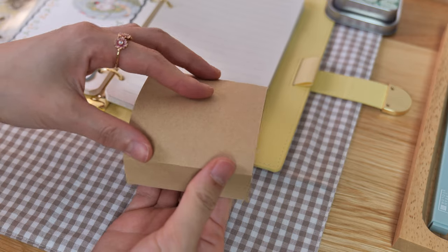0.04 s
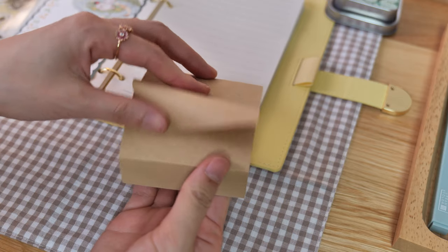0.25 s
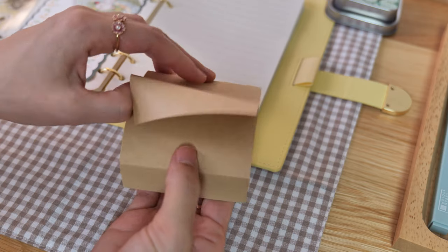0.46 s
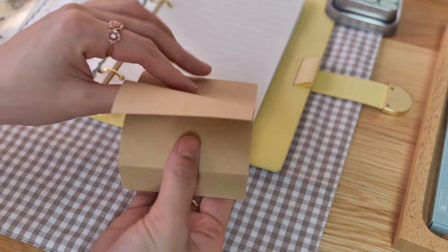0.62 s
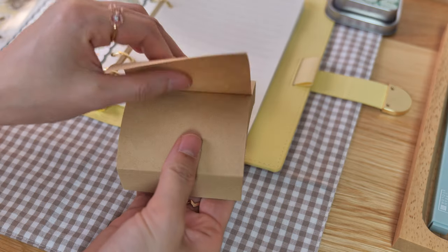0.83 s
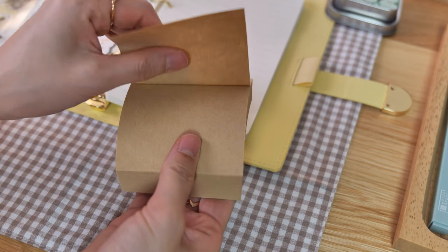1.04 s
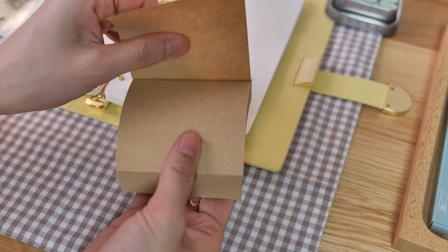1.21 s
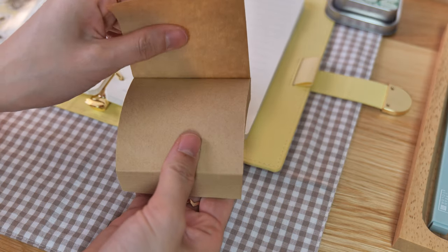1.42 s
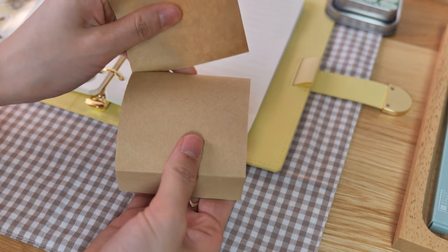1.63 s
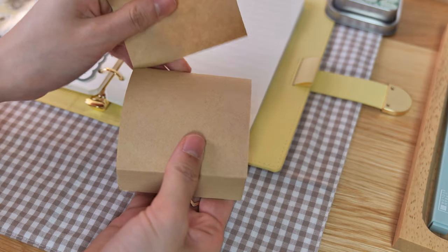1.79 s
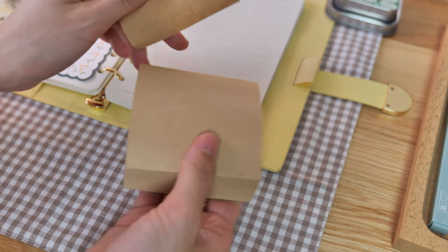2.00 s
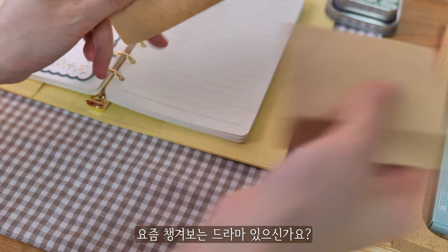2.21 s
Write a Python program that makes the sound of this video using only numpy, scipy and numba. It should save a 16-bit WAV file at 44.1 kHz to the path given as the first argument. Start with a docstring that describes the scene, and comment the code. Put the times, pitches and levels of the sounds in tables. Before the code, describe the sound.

A stiff paper sheet scrapes over its pad and buckles with two sharp snaps. Fingers rub it softly, then it peels off the glued edge with small crackling pops, followed by light handling. Close up in a quiet, dry room.

```python
"""A stiff paper sheet is pushed back over its pad, scraping, and buckles with two sharp snaps.
It flexes, knocks the pad, is rubbed between finger and thumb, then tears off the glued edge in small pops.
The freed sheet flaps and the pad is handled. Friction is fibres catching and slipping; snaps and pops
are sudden releases that ring the paper. All of it is close by, in a quiet, dry room."""
import sys
import numpy as np
from scipy import signal
from scipy.fft import rfft, irfft
from scipy.io import wavfile
from scipy.ndimage import uniform_filter1d
from numba import njit

SR = 44100
rng = np.random.default_rng(int(sys.argv[2]) if len(sys.argv) > 2 else 0)


def digitize_waveform(pressure):
    """Quantize a signal to 16-bit integers and store it at the path in sys.argv[1].

    Rows of a 2-D input are taken as channels; values are limited to [-1, 1].
    """
    field = np.atleast_2d(pressure).T
    bounded = np.clip(field, -1, 1)
    quanta = np.round(bounded * 32767).astype(np.int16)
    wavfile.write(sys.argv[1], SR, quanta)


N = 103635
TIME_S = np.arange(N) / SR


def undb(db):
    """Decibels to gain."""
    return 10 ** (np.asarray(db) / 20)


def unit(x):
    """Scale to rms 1."""
    return x / np.sqrt(np.mean(x ** 2) + 1e-24)


def envelope(curve):
    """Level curve as gain, silent beyond its ends."""
    time_s, db = np.array(curve).T
    return undb(np.interp(TIME_S, np.r_[time_s[0] - .01, time_s, time_s[-1] + .01], np.r_[-120, db, -120]))


def colour(x, spectrum, tilt_db_per_oct=0, tilt_from_hz=2160):
    """Minimum-phase filter with a treble tilt; keeps the power of white noise."""
    size = 2048
    hz, db = np.array(spectrum).T
    octave = np.log2(np.maximum(np.arange(size // 2 + 1), 1) * SR / size)
    tilt_db = tilt_db_per_oct * np.maximum(octave, np.log2(tilt_from_hz))
    cepstrum = irfft(np.log(undb(np.interp(octave, np.log2(hz), db) + tilt_db)))
    causal = np.r_[cepstrum[0], 2 * cepstrum[1:size // 2]]
    impulse = irfft(np.exp(rfft(causal, size)))
    return signal.fftconvolve(x, impulse / np.linalg.norm(impulse))[:len(x)]


@njit
def sweep(x, hz, width_hz):
    """Moving resonance, gain 1 at its centre."""
    y = np.empty(len(x))
    band_state, low_state = 0., 0.
    for i in range(len(x)):
        g = np.tan(np.pi * hz[i] / SR)
        damping = width_hz / hz[i]
        band = (band_state + g * (x[i] - low_state)) / (1 + g * (g + damping))
        band_state = 2 * band - band_state
        low_state += 2 * g * band
        y[i] = damping * band
    return y


def wander(rate_hz):
    """Smooth random drift, rms 1."""
    hold = max(int(SR / rate_hz), 1)
    return unit(uniform_filter1d(rng.standard_normal(N)[np.arange(N) // hold], hold))


def add(out, time_s, x):
    """Mix x in at time_s."""
    start = int(time_s * SR)
    out[start:start + len(x)] += x[:N - start]


def fibres(slips_per_s, spread_db, hiss, spurt_db, spurt_hz):
    """Fibres catch and slip: dense clicks over fine hiss, in spurts."""
    slips = (rng.random(N) < slips_per_s / SR) * rng.choice([-1, 1], N)
    sizes = undb(spread_db * np.minimum(rng.exponential(size=N), 4))
    grain = unit(slips * sizes) + hiss * rng.standard_normal(N)
    return unit(grain * undb(spurt_db * wander(spurt_hz)))


def burst(decay_s, kick_s=0.00023):
    """Sudden release: a kick and a fast-dying rattle."""
    t = TIME_S[:SR // 8]
    return rng.choice([-1, 1], len(t)) * np.exp(-t / decay_s) * (1 + np.exp(-t / kick_s))


def cracks(events, spectrum):
    """Sudden slips ring the paper for a few milliseconds."""
    out = np.zeros(N)
    for time_s, db, decay_s, tilt in events:
        add(out, time_s, undb(db) * colour(burst(decay_s), spectrum, tilt))
    return out


# still air (frequency [Hz], level [dB])
AIR_SPECTRUM = [(25, -15), (120, -12), (220, -5.5), (450, -7), (750, -12.5), (900, -4.5), (1150, -13.5),
                (1700, -20.5), (4000, -27), (15500, -29.5)]


def room_tone(air_db=-55, hum_hz=81, hum_db=-69.5):
    """Still air and a low, wavering hum."""
    air = unit(colour(rng.standard_normal(N), AIR_SPECTRUM))
    hum = np.sqrt(2) * np.sin(2 * np.pi * hum_hz * TIME_S)
    return undb(air_db) * air + undb(hum_db + 2.1 * wander(3.7)) * hum


# sheet-on-pad friction (time [s], level [dB])
SLIDE_LEVEL = [(.13, -78), (.156, -46), (.195, -48), (.204, -33), (.216, -36), (.228, -16.5), (.252, -21.5),
               (.282, -20.5), (.34, -25.5), (.408, -33.5), (.44, -21), (.466, -22), (.485, -21.5),
               (.508, -16.5), (.521, -29.5), (.546, -41), (.592, -31.5), (.603, -24.5), (.62, -33.5),
               (.69, -38.5), (.8, -41.5), (.844, -49.5), (.874, -73.5)]
# friction by stage (frequency [Hz], level [dB])
CATCH_SPECTRUM = [(100, -37), (300, -5), (900, -5.5), (1600, -11), (2200, -8.5), (3200, -9), (5500, 1.5),
                  (7200, -3), (8700, 1.5), (10200, -13), (13000, -7), (15500, -18.5)]
SLIDE_SPECTRUM = [(88, -60), (150, -33), (400, -20.5), (894, -20.5), (1570, -22), (2060, -8.5),
                  (3040, -2.5), (6230, -3), (6860, -12), (8660, -0.5), (10300, -15.5), (13000, -9.5),
                  (15500, -14)]
PUSH_SPECTRUM = [(100, -27.5), (550, -8.5), (750, -21.5), (1600, -8), (3100, -10), (3700, 2.5),
                 (4300, -1.5), (6500, -12.5), (8500, 2.5), (10000, -8), (12500, -1), (15500, -8.5)]
SETTLE_SPECTRUM = [(120, -17), (400, -12.5), (1200, -14), (2000, -3.5), (2700, -5), (3600, -3.5),
                   (4600, -3.5), (6800, -6), (8700, 4), (10300, -10.5), (13500, -3), (15500, -17)]
# catch end, slide start/end, push start/end, buckle start/end, settled (time [s])
STAGE_TIMES_S = [.2, .24, .39, .435, .465, .485, .51, .57]


def sliding(edge_hz=3710, sag_hz_per_s=250, edge_db=-6):
    """The sheet scrapes over the one beneath; the ring of its edge sinks as it curls."""
    stages = [CATCH_SPECTRUM, SLIDE_SPECTRUM, SLIDE_SPECTRUM, PUSH_SPECTRUM,
              PUSH_SPECTRUM, SLIDE_SPECTRUM, SLIDE_SPECTRUM, SETTLE_SPECTRUM]
    scrape = np.zeros(N)
    for share, spectrum in zip(np.eye(len(stages)), stages):
        grain = fibres(slips_per_s=9000, spread_db=2.5, hiss=0.72, spurt_db=1.0, spurt_hz=250)
        crossfade = np.sqrt(np.interp(TIME_S, STAGE_TIMES_S, share))
        scrape += crossfade * colour(grain, spectrum)
    edge = sweep(scrape, edge_hz - sag_hz_per_s * TIME_S, width_hz=400.)
    return envelope(SLIDE_LEVEL) * (scrape + undb(edge_db) * edge)


# buckling snaps (time [s], level [dB], decay [s], tilt [dB/oct])
BUCKLE_SNAPS = [(.2268, -28, 0.0024, 1.5), (.2765, -22, 0.0028, -0.5), (.4737, -1, 0.003, -1.5),
                (.5102, -7.5, 0.0035, 2.5), (.6002, -20.5, 0.0015, -2), (.6055, -17, 0.0021, 6)]
# ring of the bent sheet (frequency [Hz], level [dB])
SNAP_SPECTRUM = [(50, -29.5), (220, -39), (400, -26), (620, -13.5), (900, -19), (1400, -17), (1900, -4),
                 (2450, -8.5), (3100, 4), (4300, 3.5), (5800, -11.5), (7000, -6), (8400, 3.5), (10500, -18),
                 (11800, -2.5), (15500, -15.5)]


def buckling():
    """The bent sheet gives way in snaps."""
    return cracks(BUCKLE_SNAPS, SNAP_SPECTRUM)


# sheet tones (time [s], frequency [Hz], level [dB], decay [s])
FLEX_TONES = [(.474, 602, -20, 0.004), (.5105, 482, -22.5, 0.0079), (0.515, 294, -35, 0.011),
              (1.194, 622, -25, 0.0056), (1.193, 1100, -18.5, 0.0029), (1.568, 315, -26.5, 0.005),
              (1.605, 211, -32, 0.012), (1.647, 1122, -20, 0.0034), (1.721, 306, -27, 0.0054),
              (1.724, 1447, -15.5, 0.0038), (1.93, 232, -33.5, 0.014), (1.929, 488, -33, 0.013),
              (1.928, 1430, -39, 0.0027)]


def flexing(attack_s=0.0027):
    """The sheet springs into a new shape and rings at a pitch set by how it is held."""
    out = np.zeros(N)
    t = TIME_S[:SR // 4]
    for time_s, hz, db, decay_s in FLEX_TONES:
        shape = np.exp(-t / decay_s) * (1 - np.exp(-t / attack_s))
        add(out, time_s, undb(db) * shape * np.sin(2 * np.pi * hz * t))
    return out


# knocks and flaps on the pad (time [s], level [dB], decay [s], centre [Hz])
PAD_KNOCKS = [(.514, -32, 0.013, 540), (.579, -35, 0.0038, 454), (0.609, -39, 0.013, 251),
              (1.194, -32, 0.0071, 754), (1.586, -35.5, 0.0055, 300), (1.6039, -35, 0.0027, 280),
              (1.6197, -32, 0.0023, 238), (1.721, -24, 0.0038, 696), (1.883, -36.5, 0.0022, 490),
              (1.932, -34.5, 0.0088, 384), (2.238, -45, 0.015, 400)]
# pad and sheet resonances (frequency [Hz], width [Hz], level [dB])
PAD_MODES = [(132, 86, 0), (264, 98, -3), (393, 130, -7), (478, 47, 0.5), (588, 200, -1.5), (897, 67, -1.5),
             (1140, 46, 2), (1420, 170, -12), (1764, 200, -28)]


def knocking(reach_oct=1.27):
    """Soft blows ring the pad; softer contact favours its lower modes."""
    out = np.zeros(N)
    for time_s, db, decay_s, centre_hz in PAD_KNOCKS:
        blow = burst(decay_s)
        ring = np.zeros(len(blow))
        for hz, width_hz, mode_db in PAD_MODES:
            weight = undb(mode_db) / (1 + (np.log2(hz / centre_hz) / reach_oct) ** 4)
            ring += weight * signal.lfilter(*signal.iirpeak(hz, hz / width_hz, fs=SR), blow)
        add(out, time_s, undb(db) * ring * np.linalg.norm(blow) / np.linalg.norm(ring))
    return out


# finger friction (time [s], level [dB])
RUB_LEVEL = [(.88, -67), (.945, -58.5), (.975, -49), (1.005, -39.5), (1.066, -35), (1.1, -43),
             (1.145, -34.5), (1.175, -40), (1.24, -37.5), (1.3, -36.5), (1.325, -42.5), (1.35, -37),
             (1.43, -50), (1.56, -52)]
# held sheet (frequency [Hz], level [dB])
HELD_SPECTRUM = [(120, -20), (280, -6), (520, -14), (900, -12.5), (1200, -3), (1700, -4.5), (2300, -14),
                 (3900, -8.5), (4650, -7.5), (6100, -7), (7700, -3.5), (8800, -1), (10200, -12),
                 (13000, -3.5), (15500, -10.5)]
# bowed-sheet resonances (frequency [Hz])
BOW_MODES_HZ = [1367, 4600, 8400]
# spectral notch (time [s], centre [Hz])
NOTCH_PATH = [(1.05, 2186), (1.48, 2700)]


def rubbing(bow_db=-5, notch_depth=0.32):
    """Finger and thumb slide along the sheet; its modes wander and a notch rises as the grip moves."""
    grain = fibres(slips_per_s=4000, spread_db=2.0, hiss=0.9, spurt_db=1.23, spurt_hz=110)
    rub = colour(grain, HELD_SPECTRUM)
    bow = sum(sweep(rub, hz * np.exp(0.076 * wander(23)), width_hz=0.075 * hz) for hz in BOW_MODES_HZ)
    notch_hz = np.interp(TIME_S, *np.array(NOTCH_PATH).T)
    notch_band = sweep(rub, notch_hz, width_hz=660.)
    return envelope(RUB_LEVEL) * unit(rub + undb(bow_db) * bow - notch_depth * notch_band)


# tearing glue (time [s], level [dB])
PEEL_LEVEL = [(1.562, -49), (1.572, -46.5), (1.6, -44), (1.625, -35.5), (1.638, -24.5), (1.651, -30),
              (1.659, -38.5), (1.692, -36.5), (1.712, -22.5), (1.72, -44.5), (1.745, -50.5), (1.77, -52)]
# its crackle (frequency [Hz], level [dB])
PEEL_SPECTRUM = [(71, -44.5), (140, -18.5), (400, -4.5), (812, -21), (1190, -5.5), (2700, -14.5),
                 (3510, -5), (4220, -11), (8500, -5), (10500, -17), (12800, -7.5), (15500, -23)]


def peeling():
    """The glued edge tears in a fine crackle."""
    grain = fibres(slips_per_s=2800, spread_db=0, hiss=0.49, spurt_db=-0.5, spurt_hz=400)
    return envelope(PEEL_LEVEL) * colour(grain, PEEL_SPECTRUM)


# sheet creaks (time [s], level [dB], decay [s], tilt [dB/oct])
TAUT_CREAKS = [(1.568, -28, 0.004, -3.5), (1.585, -31, 0.0027, -3), (1.604, -30, 0.0031, -2)]


def creaking():
    """The taut sheet creaks before the glue gives."""
    return cracks(TAUT_CREAKS, HELD_SPECTRUM)


# glue pops (time [s], level [dB], decay [s], tilt [dB/oct])
GLUE_POPS = [(1.6392, -19, 0.00086, -3), (1.6419, -15.5, 0.00078, 1.5), (1.6478, -15.5, 0.0033, 2.5),
             (1.7125, -19.5, 0.0019, 1)]
# their ring (frequency [Hz], level [dB])
POP_SPECTRUM = [(80, -31), (250, 0), (400, -22), (800, -9.5), (1100, 0.5), (1700, 3), (2900, -7), (3500, 2),
                (4400, -8.5), (8500, -5), (10500, -13), (15500, -22)]


def popping():
    """The glue lets go in small pops."""
    return cracks(GLUE_POPS, POP_SPECTRUM)


# loose-sheet friction (time [s], level [dB])
BRUSH_LEVEL = [(1.76, -68), (1.78, -53.5), (1.825, -44), (1.846, -41), (1.86, -50), (1.915, -38.5),
               (1.95, -58), (2.01, -57.5), (2.085, -48), (2.16, -60)]
# loose sheet (frequency [Hz], level [dB])
BRUSH_SPECTRUM = [(150, -9.5), (500, -13.5), (1400, -3), (2300, -10), (3600, -1), (6000, -7), (8800, -3),
                  (10300, -15), (13000, -3), (15500, -15)]


def brushing():
    """The freed sheet brushes the fingers."""
    grain = fibres(slips_per_s=2300, spread_db=6, hiss=0.92, spurt_db=2.0, spurt_hz=91)
    return envelope(BRUSH_LEVEL) * colour(grain, BRUSH_SPECTRUM)


# edge flick (time [s], level [dB], decay [s], tilt [dB/oct])
EDGE_FLICK = [(1.927, -22, 0.003, -1.5)]
# hand-on-pad friction (time [s], level [dB])
HAND_LEVEL = [(1.94, -64), (2.06, -52.5), (2.076, -43.5), (2.118, -46), (2.144, -37.5), (2.158, -56),
              (2.208, -48), (2.226, -58), (2.29, -46), (2.332, -41), (2.38, -55)]
# pad surface (frequency [Hz], level [dB])
PAD_SPECTRUM = [(88, -28), (150, -9.5), (490, -3.5), (850, -17), (1420, 0.5), (1940, -13), (3040, -5),
                (10500, -15), (12800, -22), (15500, -21)]


def handling():
    """The sheet's edge flicks the pad; then the hand shifts on it."""
    grain = fibres(slips_per_s=2800, spread_db=2.5, hiss=0.94, spurt_db=1.3, spurt_hz=100)
    return cracks(EDGE_FLICK, PAD_SPECTRUM) + envelope(HAND_LEVEL) * colour(grain, PAD_SPECTRUM)


def reflections(x, t60_s, gap_s):
    """Dense reflections die away after a short gap."""
    tail = rng.standard_normal(N) * undb(-60 * TIME_S / t60_s) * (TIME_S > gap_s)
    return signal.fftconvolve(x, tail / np.linalg.norm(tail))[:N]


def desk(x, scatter_db=-14):
    """Early reflections off the desk and its things add a hollow colour."""
    return x + undb(scatter_db) * reflections(x, t60_s=0.025, gap_s=0.0012)


def room(x, echo_db=-19.5):
    """The room adds a faint, short, dull echo."""
    echo = reflections(x, t60_s=0.17, gap_s=0.0061)
    return x + undb(echo_db) * colour(echo, [(100, 1.5), (1000, -5.0), (4000, -11), (15000, -20.5)])


def scene():
    """Sheet and pad at a desk in a quiet room, mono."""
    bending = sliding() + buckling()
    tearing = creaking() + peeling() + popping()
    fingers = rubbing() + brushing() + handling()
    paper = desk(bending + tearing + fingers) + knocking() + flexing()
    return (room(paper) + room_tone())[None]


def record(dry, ceiling=0.9, cutoff_hz=15700):
    """Clip the loudest peaks, then low-pass."""
    lowpass = signal.ellip(10, .1, 70, cutoff_hz, fs=SR, output="sos")
    return signal.sosfilt(lowpass, np.clip(dry, -ceiling, ceiling))


dry = scene()
out = record(dry)
digitize_waveform(out)
```